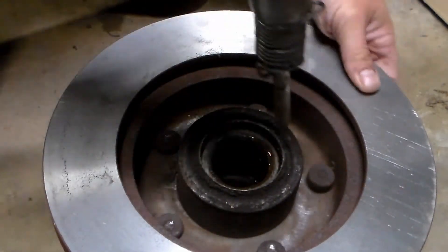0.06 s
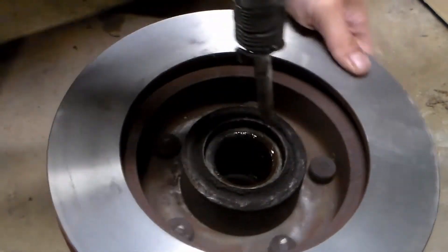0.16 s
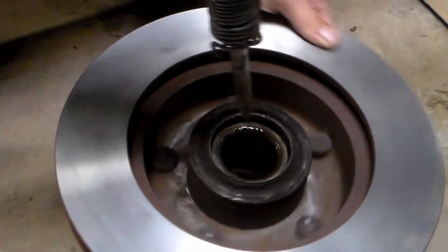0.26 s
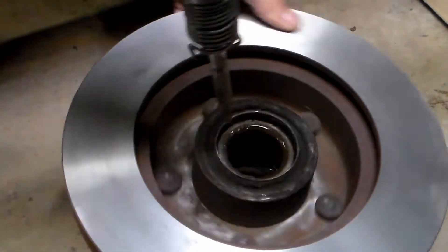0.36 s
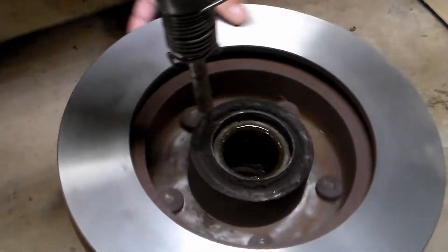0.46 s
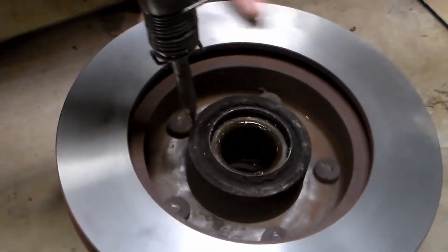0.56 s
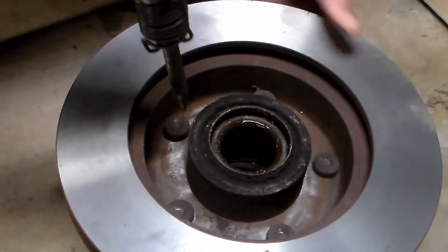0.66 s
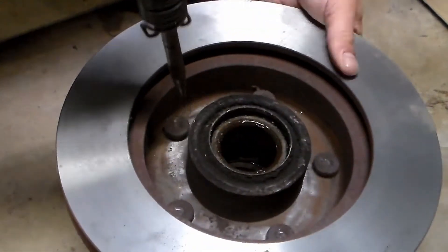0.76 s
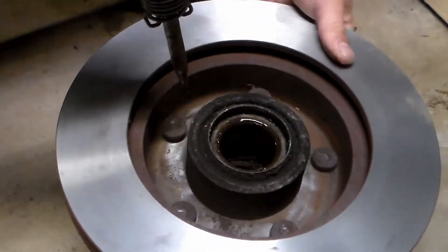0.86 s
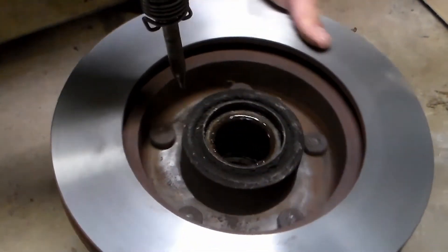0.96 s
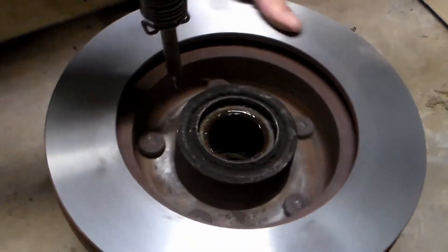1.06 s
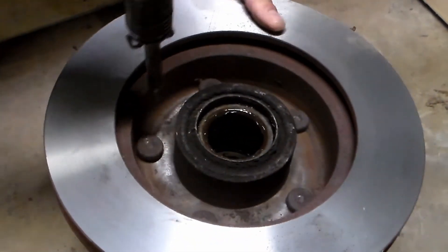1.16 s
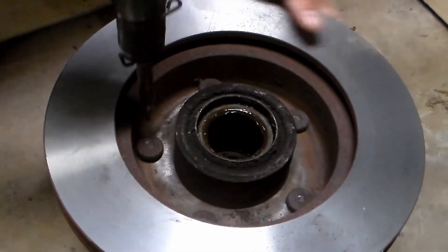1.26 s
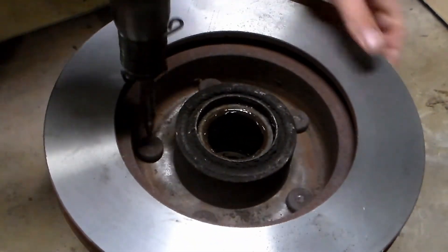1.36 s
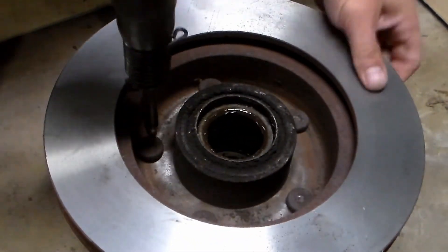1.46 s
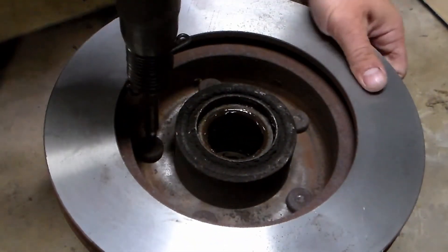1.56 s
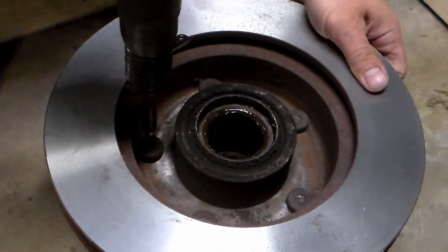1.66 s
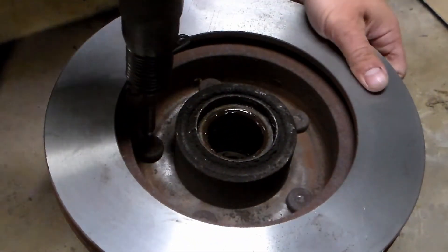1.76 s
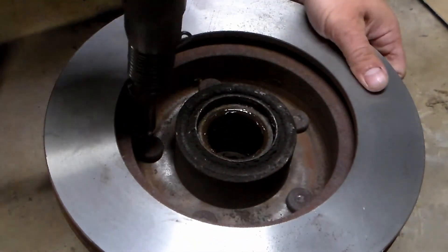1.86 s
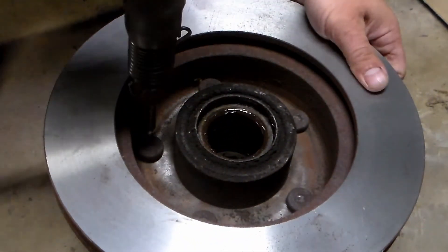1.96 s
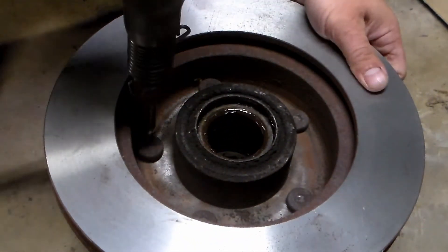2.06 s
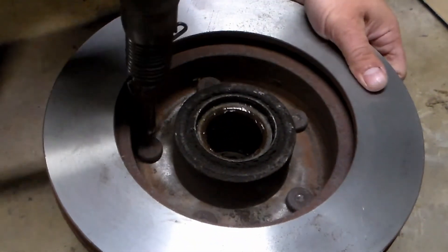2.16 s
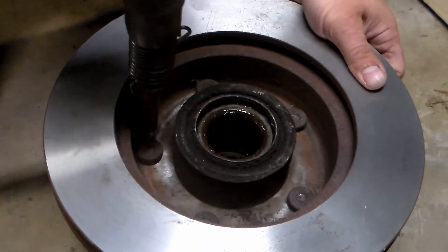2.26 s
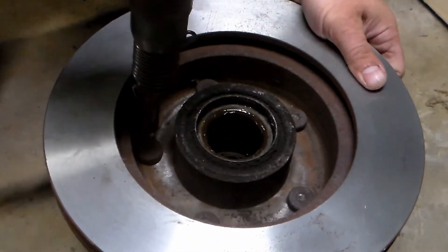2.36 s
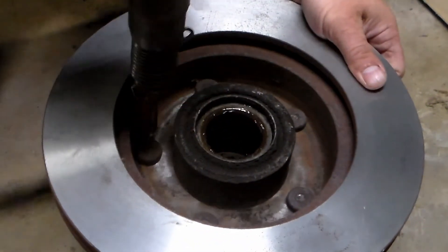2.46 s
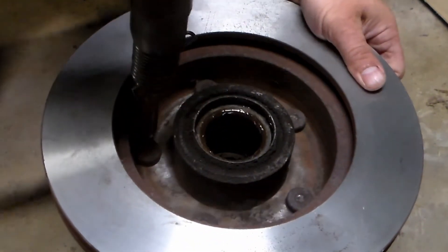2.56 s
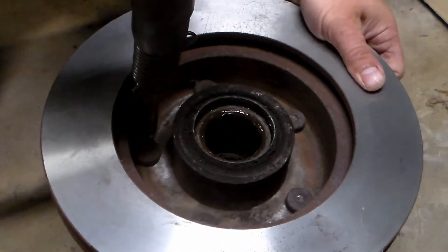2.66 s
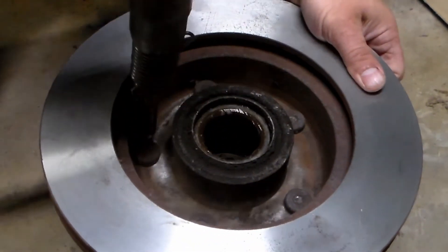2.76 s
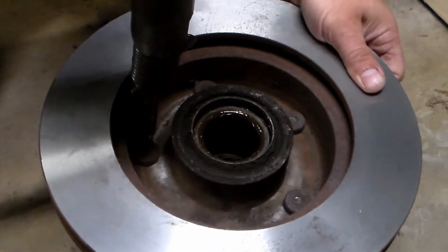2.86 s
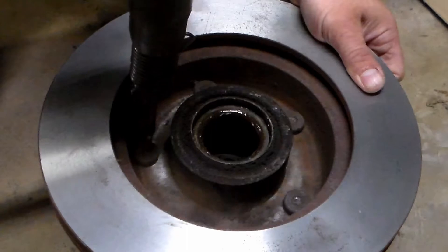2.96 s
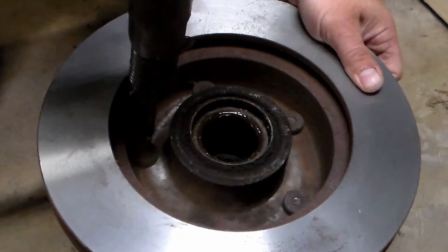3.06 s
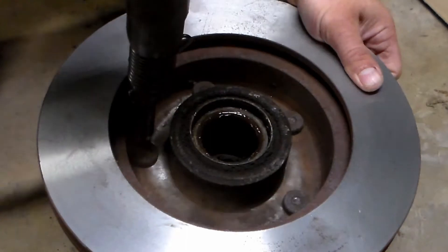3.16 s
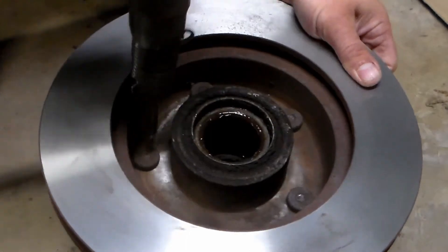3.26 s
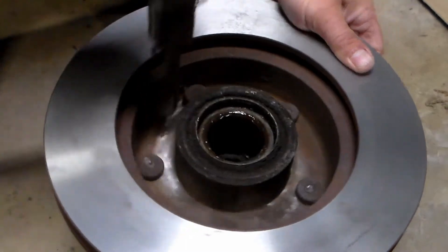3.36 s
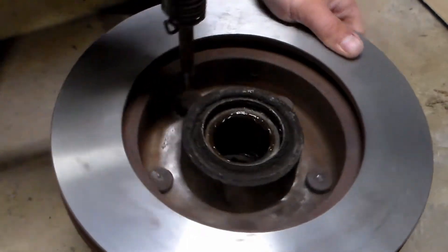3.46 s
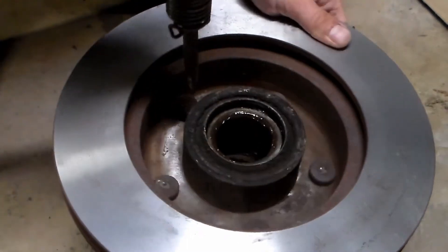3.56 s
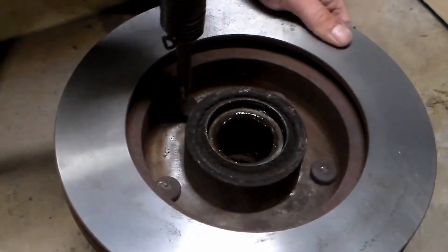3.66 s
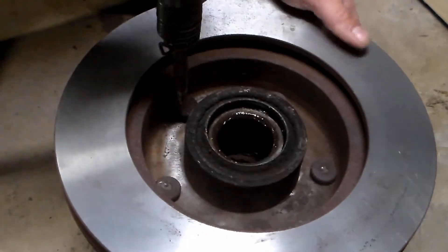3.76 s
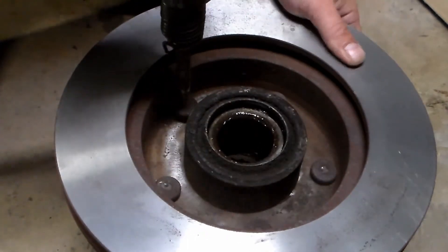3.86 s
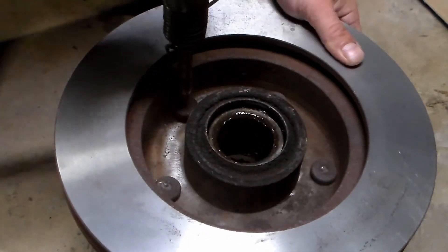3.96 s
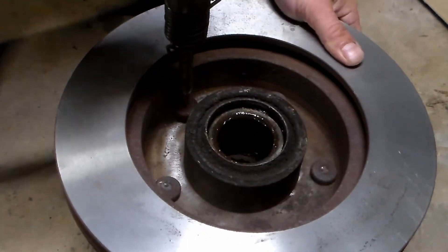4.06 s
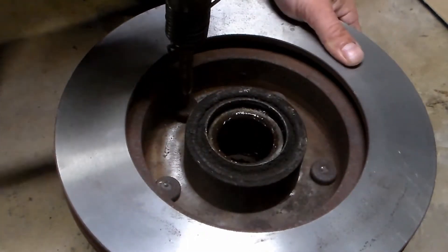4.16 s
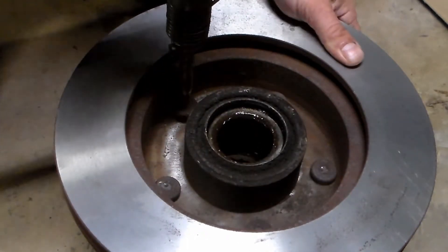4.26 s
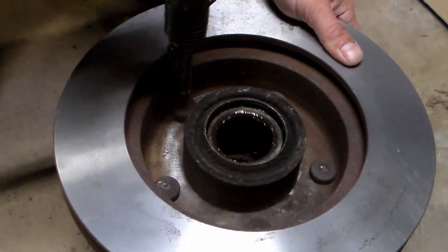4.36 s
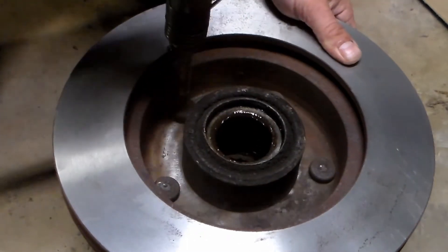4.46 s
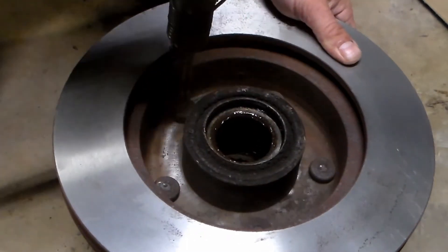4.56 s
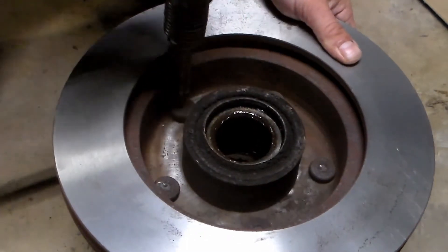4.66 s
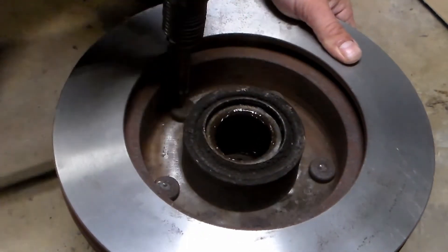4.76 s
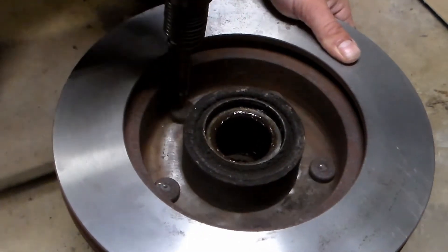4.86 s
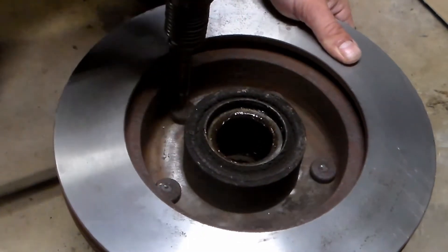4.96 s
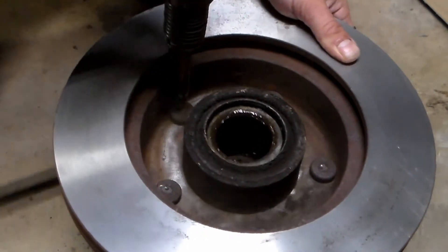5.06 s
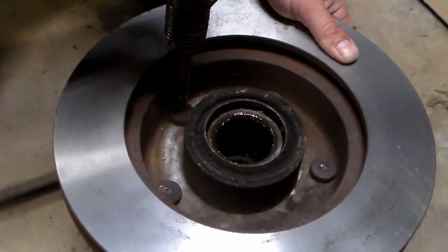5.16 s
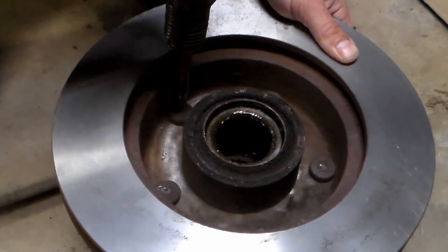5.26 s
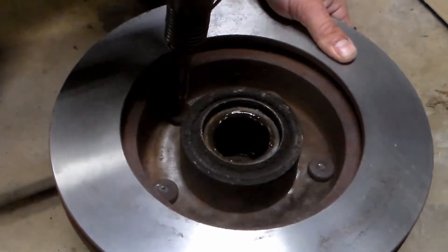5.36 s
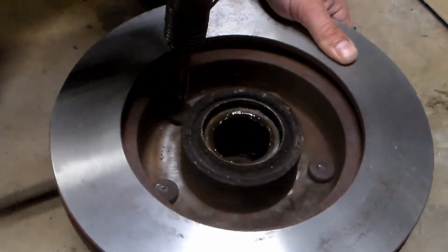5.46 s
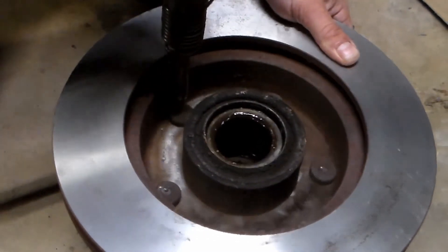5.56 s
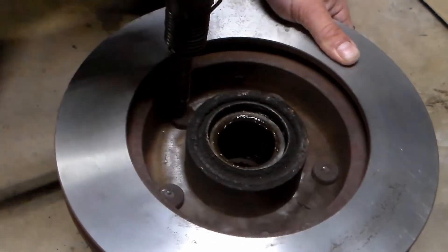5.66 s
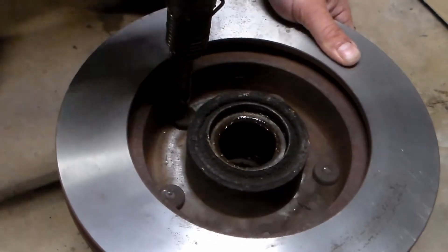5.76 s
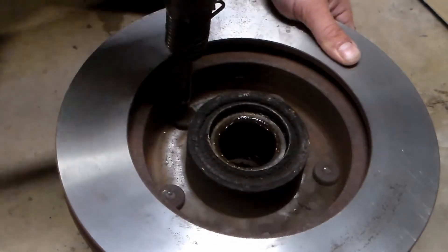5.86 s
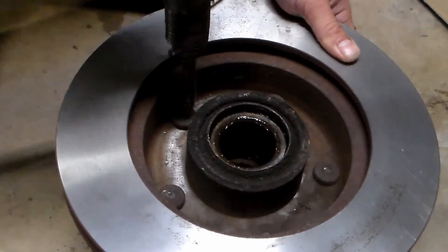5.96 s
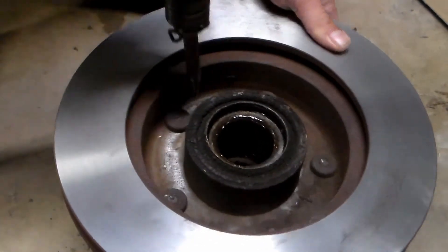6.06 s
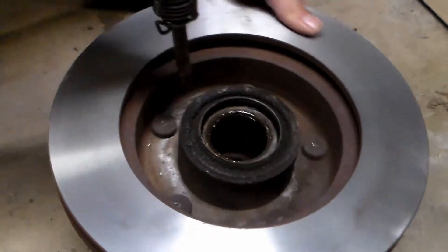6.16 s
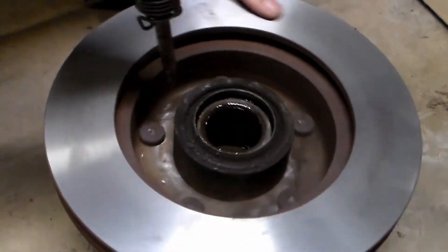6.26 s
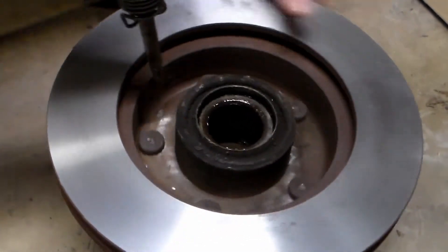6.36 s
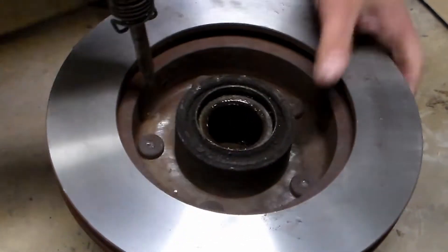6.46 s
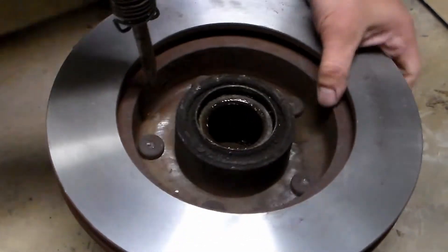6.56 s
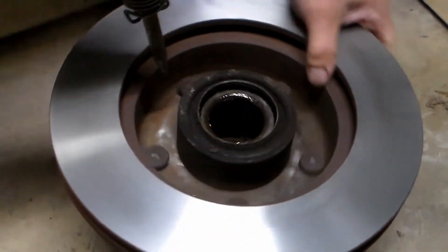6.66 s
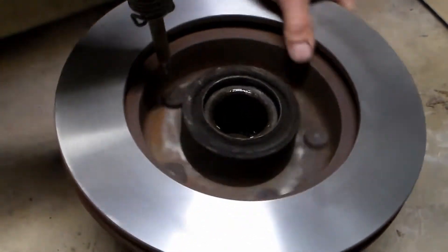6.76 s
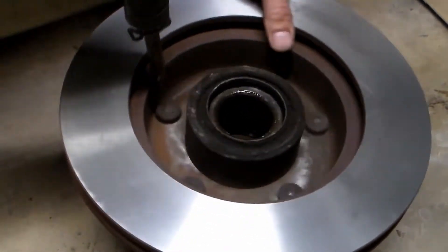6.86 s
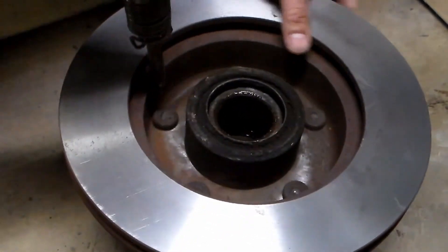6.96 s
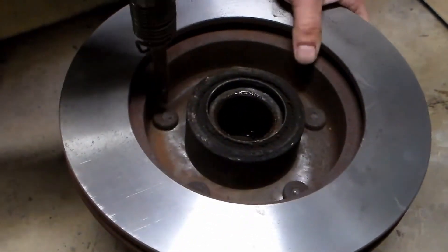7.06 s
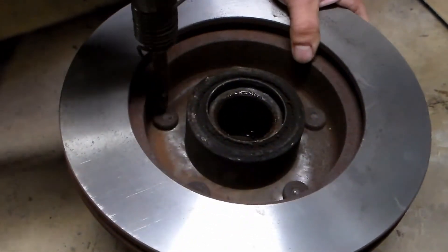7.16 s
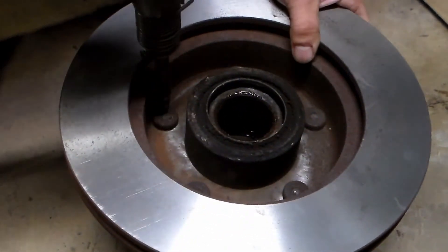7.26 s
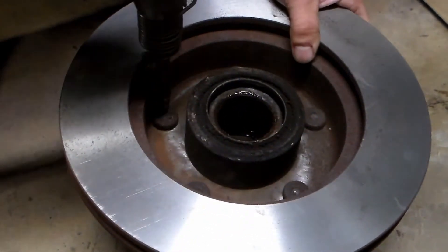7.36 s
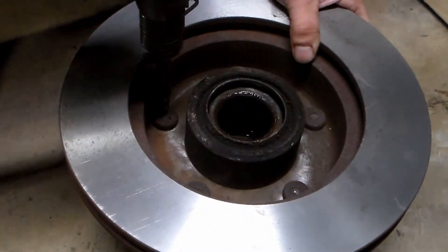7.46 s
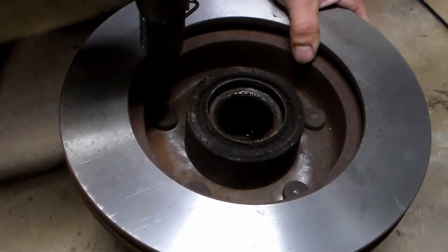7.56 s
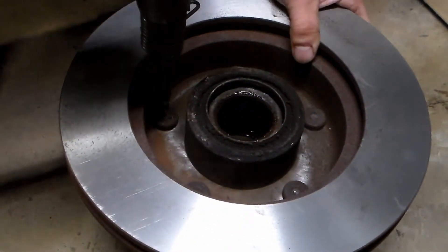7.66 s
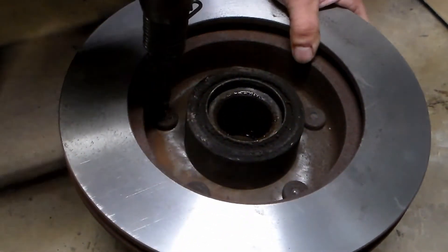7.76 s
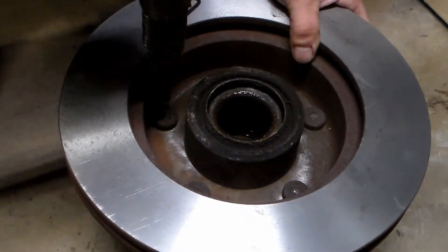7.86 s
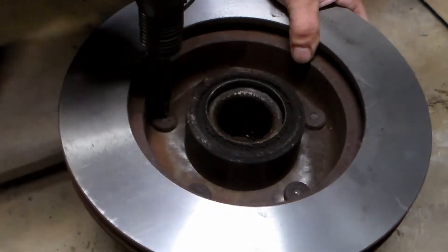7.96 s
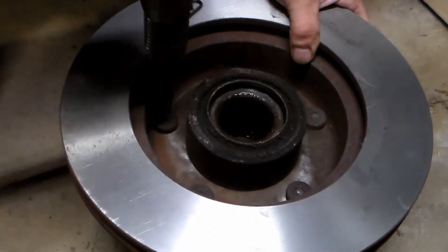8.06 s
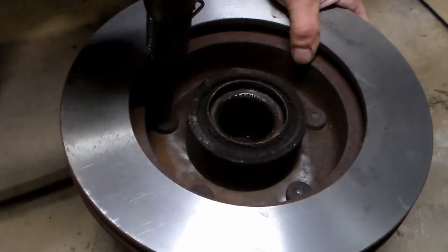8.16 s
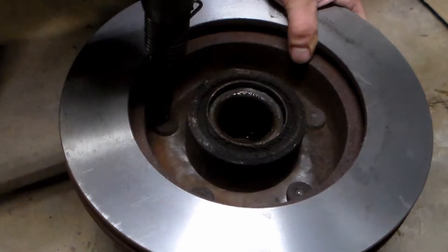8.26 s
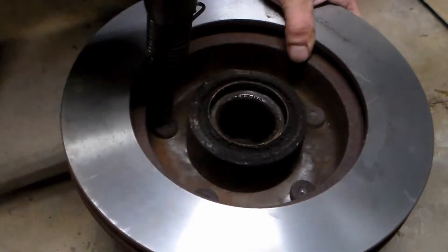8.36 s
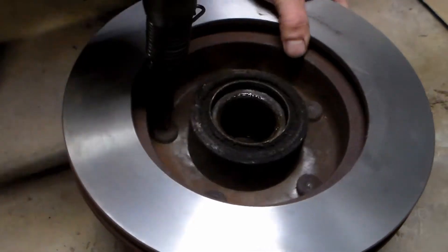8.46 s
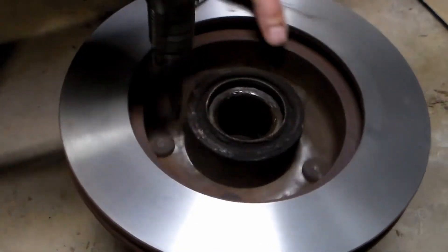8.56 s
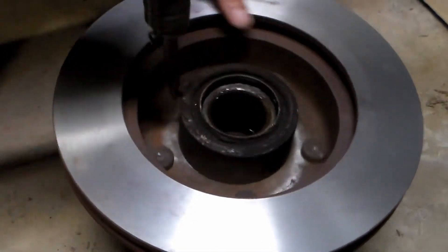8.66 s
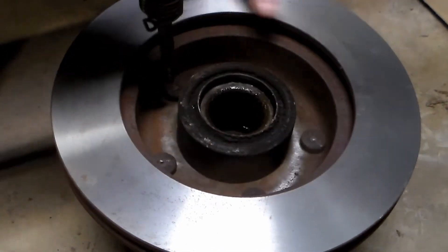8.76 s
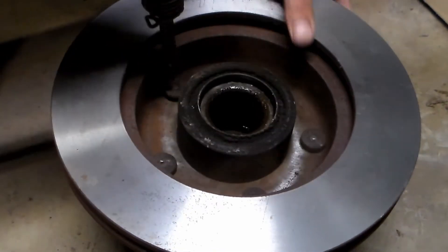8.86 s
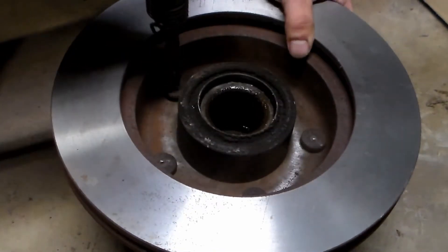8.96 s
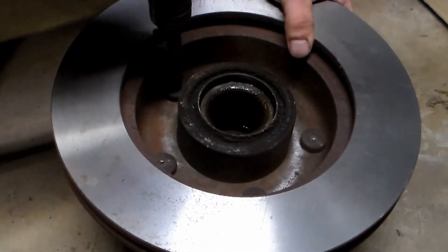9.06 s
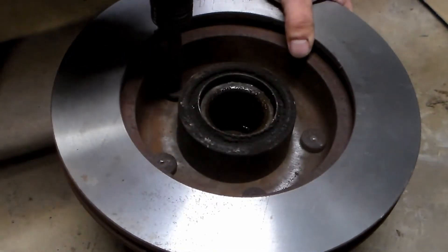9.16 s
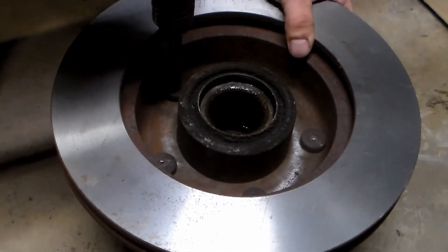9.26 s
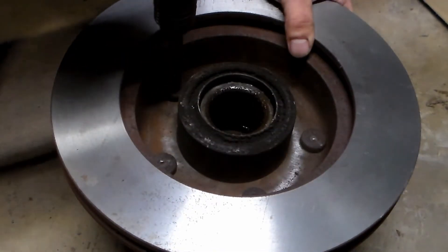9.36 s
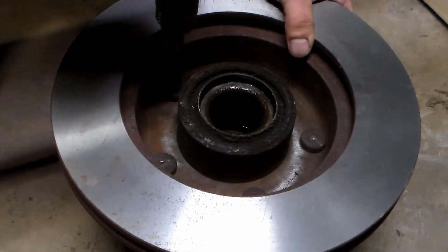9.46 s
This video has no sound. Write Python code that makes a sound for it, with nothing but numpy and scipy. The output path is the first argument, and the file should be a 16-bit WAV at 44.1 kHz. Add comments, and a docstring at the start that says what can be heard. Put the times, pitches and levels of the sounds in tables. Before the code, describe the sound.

A heavy brake rotor scrapes and knocks on a concrete garage floor over faint mains hum. Then a pneumatic hammer rattles out four very short, loud metallic bursts, pauses, fires five more, and after a juddering drag and clanks ends with two bursts. Air spits and hisses around the strokes. Close microphone, slightly overloaded on the blows, short room tail.

```python
"""Over a low mains hum, a brake rotor is dragged and rocks on a concrete garage floor: grit noise and iron knocks.
Then an air hammer drives out its wheel studs in short bursts, with more handling between them.
Each piston stroke puffs exhaust air (decaying sines and hiss), then strikes the chisel (shaped noise),
which rings the rotor (decaying modes); the microphone flattens the loudest swings."""
import sys
import numpy as np
from scipy import signal
from scipy.fft import rfft, irfft
from scipy.io import wavfile
from scipy.ndimage import uniform_filter1d

SR = 44100
rng = np.random.default_rng(int(sys.argv[2]) if len(sys.argv) > 2 else 0)


def file_out(sig):
    """Save sig as 16-bit WAV at sys.argv[1]."""
    # one column per channel
    cols = np.atleast_2d(sig).T
    # limit, then scale
    lim = np.clip(cols, -1, 1)
    pcm = np.round(lim * 32767).astype(np.int16)
    wavfile.write(sys.argv[1], SR, pcm)


N = 419832
TIME = np.arange(N) / SR
AGE = TIME[:SR // 2]  # time since an event [s]


def amp(db):
    """Decibels to gain."""
    return 10 ** (np.asarray(db) / 20)


def at_hz(rows, hz):
    """Interpolate a curve on a log-frequency axis."""
    f, value = np.transpose(rows)
    return np.interp(np.log(hz + 1e-3), np.log(f), value)


def unit(x):
    """Scale to rms 1."""
    return x / np.sqrt(np.mean(x ** 2))


def fade(t60_s):
    """Exponential decay, 60 dB in t60_s."""
    return np.exp(-np.log(1000) * AGE / t60_s)


def bins(size):
    """Frequencies of a real FFT [Hz]."""
    return np.fft.rfftfreq(size, 1 / SR)


def smooth_noise(samples):
    """Moving-average noise over the whole scene, rms 1."""
    return unit(uniform_filter1d(rng.standard_normal(N), size=samples))


# stereo width: (frequency [Hz], side minus mid [dB])
STEREO_WIDTH = [(100, -7), (300, -20.5), (600, -24.5), (1200, -15.5), (2500, -13.5), (4500, -5.5),
                (9000, -2)]


def pair(mid, side, hz):
    """Left and right: most alike in the low mids, widest in the treble."""
    width = amp(at_hz(STEREO_WIDTH, hz))
    return np.array([mid + width * side, mid - width * side]) / np.sqrt(1 + width ** 2)


def noise(spectrum, size, colour=1):
    """Stereo noise of a given spectrum, rms 1; colour is a further gain per frequency."""
    hz = bins(size)
    mid, side = rfft(rng.standard_normal((2, size))) * amp(at_hz(spectrum, hz)) * colour
    return unit(irfft(pair(mid, side, hz), size))


def add(track, s, sound):
    """Mix a sound in at s seconds."""
    start = max(int(s * SR), 0)
    track[:, start:start + sound.shape[-1]] += sound[..., :N - start]


def ring(modes, scatter_db, blur_hz=3):
    """Struck metal: each contact shares energy differently among the modes; chatter blurs their pitch."""
    age, out = AGE[:SR // 5], np.zeros((2, len(AGE)))
    for hz, db, t60_s in modes:
        chatter = np.cumsum(rng.standard_normal(len(age))) * np.sqrt(2 * np.pi * blur_hz / SR)
        mid, side = np.sin(2 * np.pi * (hz * age + rng.random((2, 1))) + chatter)
        level = amp(db + scatter_db * rng.standard_normal())
        decay = np.exp(-np.log(1000) * age / t60_s)
        out[:, :len(age)] += level * decay * pair(mid, side, hz)
    return out / np.sqrt(np.sum(amp(np.array(modes)[:, 1]) ** 2) / 2)


# rotor and chisel modes, relative levels: (frequency [Hz], t60 [s], level at stud 1, 2, 3 [dB])
ROTOR_MODES = [(1076, .14, -15, -17.5, -12), (1440, 0.075, -21, -11, -11), (2253, 0.19, -6.5, -4.5, -4),
               (2431, 0.087, 0.5, -5, 0), (2503, 0.12, 2.5, 0.5, -1.5), (2632, 0.13, -5, -2.5, -6.5),
               (3417, 0.099, -8.5, -3, -1.5), (3507, 0.12, -7.5, -3, -2.5), (4055, 0.11, -5.5, -2.5, -6),
               (4140, 0.15, -5.5, -0.5, -3), (4715, 0.11, -6, -11, -12), (4895, 0.12, -6, -4.5, -12.5),
               (5400, 0.16, -4.5, -10, -23.5), (6836, 0.25, -11, -17, -16),
               (6570, 0.21, -16.5, -6.5, -12.5), (6790, 0.26, -11, -11.5, -7.5),
               (7830, 0.17, -12.5, -19.5, -10.5), (8340, 0.19, -12.5, -8, -10),
               (10330, 0.091, -14.5, -5.5, -14)]
# chisel moves to the next stud: time [s]
STUD_CHANGE_TIMES = [3.9, 7.0]


def rotor(s, tilt_db_per_octave=0):
    """Modes as struck at the stud being worked on, tilted toward treble or bass."""
    stud = np.searchsorted(STUD_CHANGE_TIMES, s)
    return [(hz, db[stud] + tilt_db_per_octave * np.log2(hz), t60_s) for hz, t60_s, *db in ROTOR_MODES]


# exhaust port and the air around it, relative levels: (frequency [Hz], level [dB], t60 [s])
EXHAUST_MODES = [(146, -28.5, 0.37), (264, -26, 0.077), (306, -26, 0.14), (393, -12, 0.041),
                 (619, 1, 0.018), (994, 0, 0.014)]


def puff():
    """A slug of air leaves the port: one steep swing and a short boom."""
    swing = 0
    for hz, db, t60_s in EXHAUST_MODES:
        wandered_hz = hz * (1 + 0.057 * rng.standard_normal())
        swing = swing - amp(db) * fade(t60_s) * np.sin(2 * np.pi * wandered_hz * AGE)
    swing = signal.sosfilt(signal.butter(1, 90, "high", fs=SR, output="sos"), swing)
    return swing / np.sqrt(np.mean(swing[:SR // 300] ** 2))


# spectrum of escaping air: (frequency [Hz], relative density [dB])
AIR_SPECTRUM = [(200, -11.5), (600, -0.5), (1500, -7.5), (3500, -4.5), (6000, -6), (8500, -1.5),
                (12000, -5), (15000, -13)]


def hiss(t60_s):
    """Spray of air that goes with a puff: noise with a soft onset."""
    return noise(AIR_SPECTRUM, len(AGE)) * fade(t60_s) * (1 - fade(0.0028))


# piston bursts: (first stroke [s], last stroke [s], strokes [count], delay of last stroke [s],
# first blow [dB], blow growth [dB per stroke], last blow [dB], lifting puff [dB])
PISTON_BURSTS = [(2.2957, 2.358, 3, 0.00035, -6, -6, -9.5, -21.5),
                 (2.59, 2.683, 4, 0.0034, -10.5, 2.5, -9, -27),
                 (2.8612, 2.955, 4, 0.0046, -5.5, -1, -8.5, -9.5),
                 (3.0945, 3.188, 4, .003, -4.5, -1, -7.5, -14), (4.493, 4.618, 5, 0.0033, -15, 3, -14, -18),
                 (4.8539, 4.977, 5, 0.0032, -10, 0.5, -10, -26),
                 (5.1493, 5.242, 4, 0.00076, -7, 0.5, -12, -11.5),
                 (5.3941, 5.5145, 5, .0031, -6, -1, -8, -31),
                 (5.6549, 5.7441, 4, 0.0011, -6.5, -1.5, -5, -14),
                 (8.065, 8.186, 5, 0.0031, -5.5, 0.5, -9.5, -20.5),
                 (8.357, 8.479, 5, 0.0085, -4.5, 0.2, -9.5, -15)]
# piston drops back on the chisel after a burst: (time [s], blow level [dB])
PISTON_REBOUNDS = [(5.289, -23), (5.805, -31)]
PUFF_DB, PUFF_SAG_DB_PER_STROKE = -3, -0.5  # pressure drops through a burst
RELEASE_DB = -4  # trigger already closing on the last stroke
STARVED_DB_PER_S = -2400  # the later the last stroke, the less air it has left
BRIGHT_FIRST_DB, BRIGHT_RUN_DB, BRIGHT_LAST_DB = 1, -2.5, 0.5  # brighter while the chisel sits loose
REBOUND_PUFF_DB, REBOUND_BRIGHT_DB = -24, 6.5


def strokes():
    """Even strokes with sagging puffs, the last late and short of air: (s, puff dB, blow dB, crack dB)."""
    rows = []
    for start, stop, count, late_s, first_db, growth_db, last_db, _ in PISTON_BURSTS:
        last = round(count) - 1
        period_s = (stop - late_s - start) / last
        for k in range(last):
            puff_db = PUFF_DB + k * PUFF_SAG_DB_PER_STROKE
            bright_db = BRIGHT_RUN_DB if k else BRIGHT_FIRST_DB
            rows.append((start + k * period_s, puff_db, first_db + k * growth_db, bright_db))
        puff_db = PUFF_DB + last * PUFF_SAG_DB_PER_STROKE + RELEASE_DB + late_s * STARVED_DB_PER_S
        rows.append((stop, puff_db, last_db, BRIGHT_LAST_DB))
    return rows + [(s, REBOUND_PUFF_DB, db, REBOUND_BRIGHT_DB) for s, db in PISTON_REBOUNDS]


# on a quick new pull the valve spits once without a blow: (time [s], puff level [dB], hiss level [dB])
VALVE_SPITS = [(2.8286, -9, -5.5), (3.063, -5, 3.5), (5.116, -11.5, -5), (5.624, -6, 1.5), (8.324, -20, -6)]
LIFT_LEAD_S, LIFT_HISS_DB = 0.014, -6.5  # a spit lifts the piston before its first stroke


def spits():
    """Air escapes without a blow: rows of (s, puff dB, hiss dB)."""
    lifts = [(start - LIFT_LEAD_S, lift_db, LIFT_HISS_DB) for start, *_, lift_db in PISTON_BURSTS]
    return VALVE_SPITS + lifts


# spectrum of a hard metal contact: (frequency [Hz], relative density [dB])
CRACK_SPECTRUM = [(150, -8.5), (500, 4), (850, -5), (1200, -5), (1900, -1.5), (2400, -15.5), (3000, 0),
                  (5000, -1.5), (7500, -2.5), (10000, -3), (14500, -12)]


def hammer(blow_lag_s=.002, return_lag_s=.0145, return_jitter_s=0.00087, return_db=-12.0, spray_db=-9,
           ring_db=-2, clang_db=7, clang_t60_s=0.066, crack_db=2, crack_t60_s=.045,
           snap_db=1, rattle_db=-16, ripple_db=4, uneven_db=0.06):
    """Each stroke: exhaust, blow on the chisel, weaker puff as the piston is thrown back."""
    out = np.zeros((2, N))
    hz = bins(len(AGE))
    # dense upper modes: ripple shared by all blows, full depth above 5 kHz
    dense = amp(ripple_db * unit(uniform_filter1d(rng.standard_normal(len(hz)), size=40)))
    dense = dense ** np.clip(hz / 5000, 0, 1)
    for s, *levels in strokes():
        puff_db, blow_db, bright_db = levels + uneven_db * rng.standard_normal(3)
        add(out, s, amp(puff_db) * (puff() + amp(spray_db) * hiss(0.023)))

        return_s = s + return_lag_s + return_jitter_s * rng.standard_normal()
        add(out, return_s, amp(puff_db + return_db) * (puff() + amp(3.5) * hiss(0.061)))

        decay = amp(snap_db) * fade(0.018) + fade(crack_t60_s) + amp(rattle_db) * fade(0.21)
        crack = noise(CRACK_SPECTRUM, len(AGE), dense) * decay
        # rotor swells for a few ms, then the pressed chisel soaks up most of the clang
        swell = (1 - fade(0.026)) * (1 + amp(clang_db) * fade(clang_t60_s))
        metal = ring(rotor(s), scatter_db=3.5, blur_hz=40) * swell
        blow = amp(ring_db) * metal + amp(crack_db + bright_db) * crack
        add(out, s + blow_lag_s, amp(blow_db) * blow)
    for s, puff_db, hiss_db in spits():
        add(out, s, amp(puff_db) * puff() + amp(hiss_db) * hiss(0.019))
    return out


# trigger held, levels before smoothing: (from [s], to [s], leaking air [dB], draught on microphone [dB])
TRIGGER_PULLS = [(2.257, 2.355, -24.5, -35), (2.571, 2.704, -20.5, -31), (2.823, 2.98, -20.5, -29),
                 (3.057, 3.215, -20, -19.5), (4.458, 4.642, -20.5, -38.5), (4.832, 5.005, -20, -36),
                 (5.111, 5.287, -20, -35.5), (5.379, 5.53, -17.5, -27.5), (5.621, 5.753, -16, -27),
                 (8.029, 8.226, -22.5, -23), (8.322, 8.505, -22.5, -21)]


def leak():
    """Air leaks as the trigger valve opens; its draught buffets the microphone."""
    flow, wind = np.zeros((2, N))
    for start, stop, air_db, wind_db in TRIGGER_PULLS:
        held = (TIME > start) & (TIME < stop)
        flow = flow + amp(air_db) * held
        wind = wind + amp(wind_db) * held
    draught = noise([(8, 12.5), (25, -5.5), (50, -23.5), (150, -48.5), (600, -100)], N)  # (Hz, dB)
    # valve opens over some ms; the jet flutters
    jet = uniform_filter1d(flow, size=700) * amp(2 * smooth_noise(180))
    # draught builds up behind the jet and dies away after it
    gust = signal.sosfilt(signal.butter(1, 3, fs=SR, output="sos"), wind)
    return jet * noise(AIR_SPECTRUM, N) + gust * draught


# dragged rotor judders in even runs: (first knock [s], knocks [count], gap [s], level [dB],
# hardness [dB per octave])
JUDDER_RUNS = [(0.507, 4, 0.022, -19, -1.5), (0.652, 3, 0.01, -25.5, -0.5), (3.597, 2, .066, -35.5, -8.5),
               (6.384, 7, 0.026, -14, -3), (9.07, 3, .028, -42.5, -8)]
JUDDER_RING_DB, JUDDER_EDGE_DB = -21, -12.5  # metal ring; weakening toward the ends of a run


def judders():
    """Runs of knocks, strongest in the middle: rows of (s, dB, metal ring dB, hardness dB per octave)."""
    rows = []
    for s, count, gap_s, db, hard_db in JUDDER_RUNS:
        for k in range(round(count)):
            off_centre = (2 * k + 1) / round(count) - 1
            rows.append((s + k * gap_s, db + JUDDER_EDGE_DB * off_centre ** 2, JUDDER_RING_DB, hard_db))
    return rows


# broad resonances of the rubbed or rocked rotor: (frequency [Hz], width [Hz], relative level [dB])
RUBBED_RESONANCES = [(1070, 49, 1.5), (1330, 300, -6), (2270, 49, 6.5), (2590, 200, 2.5), (3620, 290, 2),
                     (4330, 200, 1.5), (5030, 130, 5.5), (6830, 770, 0), (10520, 990, -4)]


def resonances(hz, strength_db):
    """Gain of the rubbed or rocked rotor: flat, with its resonances standing out."""
    peaks = sum(amp(db) / (1 + (2 * (hz - f) / width) ** 2) for f, width, db in RUBBED_RESONANCES)
    return 1 + amp(strength_db) * peaks


# rotor rocks on the floor, chisel is set down on it: (time [s], level [dB], metal ring [dB],
# hardness [dB per octave])
FLOOR_KNOCKS = [(0.365, -18.5, -30, -3.5), (0.383, -16, -22, -2.5), (0.406, -23.5, -21, -2),
                (0.445, -14.5, -12, 1.5), (0.473, -15.5, -25, -1.5), (0.53, -26, -24, 8),
                (0.695, -18, -11, 1.7), (0.759, -20, -18, 2), (1.682, -22, -10.5, 2), (1.85, -32, -28, 0),
                (1.887, -34, -19, 3), (1.94, -25, -22, 0.7), (4.103, -24.5, -7, -7), (4.118, -24, -12, 8.5),
                (6.707, -32.5, -5, 0), (6.812, -21.5, -5, -8), (6.836, -12, -18, 2.5),
                (6.875, -17, -11, 3.5), (6.923, -17, -14, 4.5), (6.965, -15.5, -9, 3.5),
                (7.055, -31, -14, 1.5), (7.45, -36, -14, -3.5), (7.666, -23.5, -13, -0.7),
                (9.222, -23.5, -8, 3), (9.253, -23, -16, -1.3)]
# spectrum of iron on concrete: (frequency [Hz], relative density [dB])
THUD_SPECTRUM = [(80, -16.5), (200, -13), (300, 4), (550, 6.5), (850, -2), (1100, -1.5), (1450, 2),
                 (1900, -14), (2400, -5), (3000, -13), (7000, -22.5), (14000, -52.5)]
# chisel tip nudged onto the stud head: (time [s], level [dB])
TIP_TAPS = [(1.825, -45.5), (7.452, -44.5), (7.507, -41.5), (7.667, -34.5), (7.684, -37), (7.733, -46.5),
            (7.848, -51.5), (9.257, -30.5), (9.396, -42.5)]
# chisel tip modes, relative levels: (frequency [Hz], level [dB], t60 [s])
TIP_MODES = [(2750, -7.5, 0.054), (3000, -5, .07), (3310, 0, 0.083), (4100, -13, .04), (8900, -9.5, 0.044)]
# loose chisel clinks in its retaining spring: (time [s], level [dB])
SPRING_CLINKS = [(1.734, -41.5), (3.702, -39.5), (6.348, -29), (8.933, -36)]
# retaining spring modes, relative levels: (frequency [Hz], level [dB], t60 [s])
SPRING_MODES = [(3676, -1.5, 0.097), (8710, 7, 0.028), (8950, 8, .07), (11500, -34.5, .08)]


def handling(thud_db=-4, thud_t60_s=0.059, ring_db=-7, ring_tilt_db_per_octave=-4,
             tick_db=-19, tick_t60_s=0.0092):
    """Iron on concrete: thud, ring and tick, brighter the harder the contact; chisel taps and clinks."""
    out, hz = np.zeros((2, N)), bins(len(AGE))
    body = resonances(hz, strength_db=4)
    for s, db, metal_db, hard_db in FLOOR_KNOCKS + judders():
        contact = amp(hard_db * np.log2(np.maximum(hz, 100)))
        thud = noise(THUD_SPECTRUM, len(AGE), contact * body) * (fade(thud_t60_s) + amp(-26) * fade(.13))
        metal = ring(rotor(s, ring_tilt_db_per_octave + hard_db), scatter_db=0.5)
        tick = noise(CRACK_SPECTRUM, len(AGE), body) * fade(tick_t60_s)
        knock = amp(thud_db) * thud + amp(ring_db + metal_db) * metal
        knock = knock + amp(tick_db + 2 * hard_db) * tick  # stronger in hard contacts
        add(out, s, amp(db) * knock * (1 - fade(0.00078)))
    for s, db in TIP_TAPS:
        add(out, s, amp(db) * ring(TIP_MODES, scatter_db=1.0, blur_hz=120))
    for s, db in SPRING_CLINKS:
        clink = ring(SPRING_MODES, scatter_db=1.5, blur_hz=40) + amp(-3) * hiss(.015)
        add(out, s, amp(db) * clink)
    return out


# pushes that slide the rotor over grit: (from [s], to [s], level [dB])
ROTOR_PUSHES = [(.16, .28, -56), (.31, .57, -47.5), (1.13, 1.27, -43), (6.38, 6.52, -43.5),
                (6.55, 6.75, -49), (6.79, 6.83, -38.5)]
# spectrum of rubbed grit: (frequency [Hz], relative density [dB])
GRIT_SPECTRUM = [(100, -2), (300, -1), (620, 3.5), (850, -10.5), (1350, -12), (1900, -15), (2800, -14),
                 (5500, -19), (7500, -18.5), (11000, -21.5), (14000, -23)]
PUSH_RISE_DB_PER_S, PUSH_FALL_DB_PER_S = 205, 186


def slide(rough_db=2.0):
    """With each push, grit catches and slips under the rotor and makes it sing faintly."""
    catches = amp(rough_db * smooth_noise(130))
    body = resonances(bins(N), strength_db=7)
    push_db = np.full(N, -np.inf)
    for start, stop, db in ROTOR_PUSHES:
        rise_db = PUSH_RISE_DB_PER_S * np.maximum(start - TIME, 0)
        fall_db = PUSH_FALL_DB_PER_S * np.maximum(TIME - stop, 0)
        push_db = np.maximum(push_db, db - rise_db - fall_db)
    return amp(push_db) * unit(noise(GRIT_SPECTRUM, N, body) * catches)


# reverberation: (frequency [Hz], t60 [s])
GARAGE_DECAY = [(100, 0.082), (260, 0.4), (700, 0.39), (2000, 0.38), (4500, 0.36), (9000, 0.27),
                (14000, 0.12)]


def garage(x, wet_db=-14.5, gap_s=0.0092):
    """Walls and floor: a short dense tail, longest in the low mids, wider than the direct sound."""
    hz, tail = bins(len(AGE)), 0
    flat = noise([(20, 0), (20000, 0)], len(AGE))
    white = rfft(flat + .45 * rng.standard_normal((2, len(AGE))))
    for k, (_, t60_s) in enumerate(GARAGE_DECAY):
        # overlapping bands, each with its own decay
        share = at_hz([(row[0], j == k) for j, row in enumerate(GARAGE_DECAY)], hz)
        tail = tail + irfft(white * share, len(AGE)) * fade(t60_s)
    tail = tail * np.clip(AGE / gap_s - 1, 0, 1)
    tail = tail / np.sqrt(np.sum(tail ** 2) / 2)
    return x + amp(wet_db) * signal.fftconvolve(x, tail, axes=1)[:, :N]


# mains hum before background gain and panning: (frequency [Hz], rms level [dB])
HUM_PARTIALS = [(60, -49), (180, -61), (300, -68)]
# room noise spectrum: (frequency [Hz], relative density [dB])
ROOM_SPECTRUM = [(20, -5.5), (50, -3), (120, -3), (210, -11), (300, -12), (600, -17.5), (1000, -24),
                 (3000, -27), (7000, -31), (14000, -30.5)]
# background level dips: (from [s], to [s], level change [dB])
BACKGROUND_DIPS = [(.39, 0.995, -13.5), (2.27, 3.72, -6.5), (4.462, 6.273, -12.5), (6.83, 7.352, -17),
                   (8.038, 9.04, -7.5)]


def background(gain_db=1.64, room_db=-55, sink_s=.035, recover_s=0.18):
    """Mains hum and faint room noise sink quickly and return slowly together; a thin hiss stays."""
    hum = 0
    for hz, db in HUM_PARTIALS:
        hum = hum + amp(db) * np.sqrt(2) * np.sin(2 * np.pi * (hz * TIME + rng.random()))
    level_db = gain_db
    for start, stop, db in BACKGROUND_DIPS:
        corners_s = [start, start + sink_s, stop, stop + recover_s]
        level_db = level_db + db * np.interp(TIME, corners_s, [0, 1, 1, 0])
    panned_hum = hum * amp([[-1.2], [1.2]])  # a little stronger on the right
    room = amp(room_db) * noise(ROOM_SPECTRUM, N)
    return amp(level_db) * (panned_hum + room) + amp(-72) * noise(AIR_SPECTRUM, N)


def scene():
    """Hammer and handling in the garage, over the hum."""
    return garage(hammer() + leak() + handling() + slide()) + background()


def record(dry, ceiling=0.92, knee=4, top_hz=14300):
    """The microphone flattens the loudest swings; a steep low-pass cuts the top."""
    flat = dry / (1 + np.abs(dry / ceiling) ** knee) ** (1 / knee)
    return signal.sosfilt(signal.ellip(12, .2, 80, top_hz, fs=SR, output="sos"), flat)


dry = scene()
out = record(dry)
file_out(out)
```